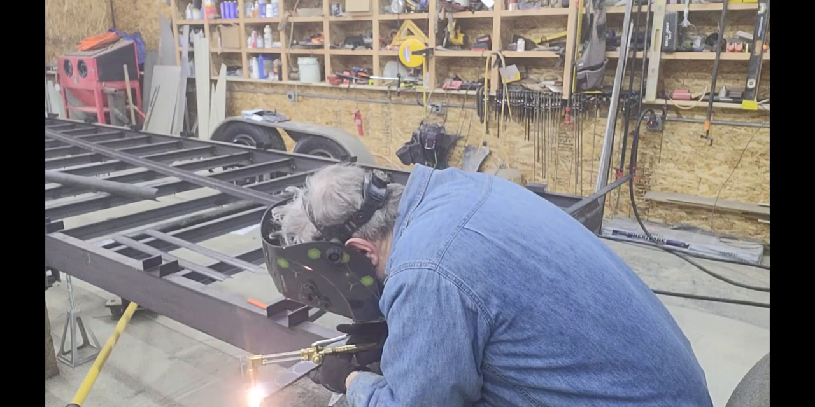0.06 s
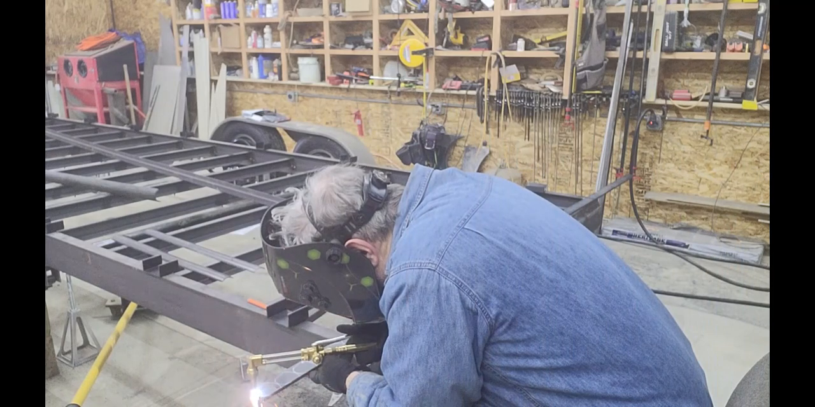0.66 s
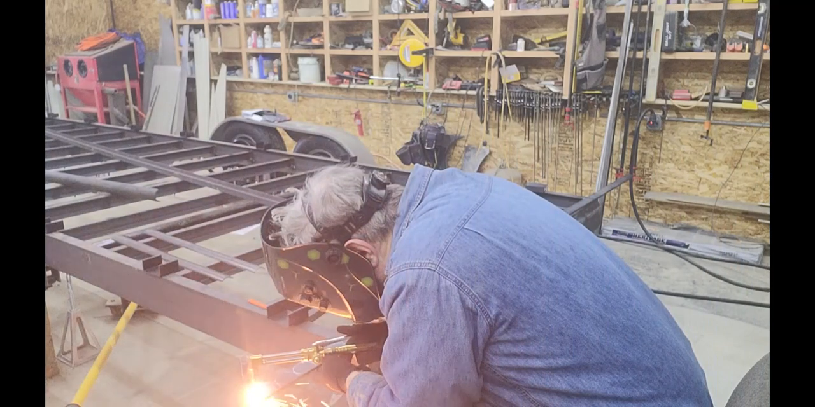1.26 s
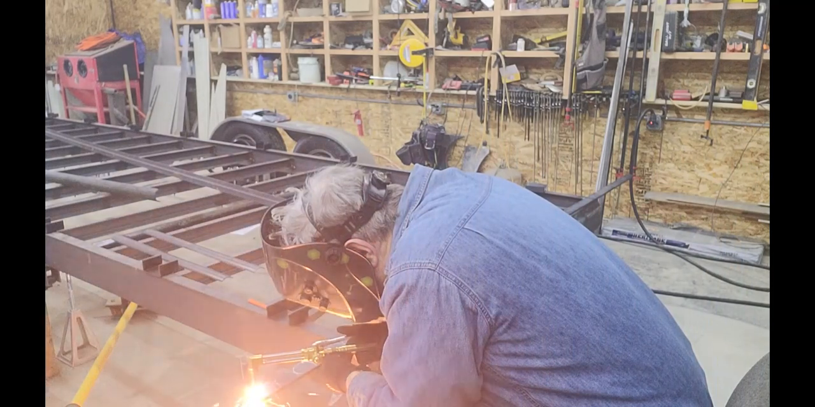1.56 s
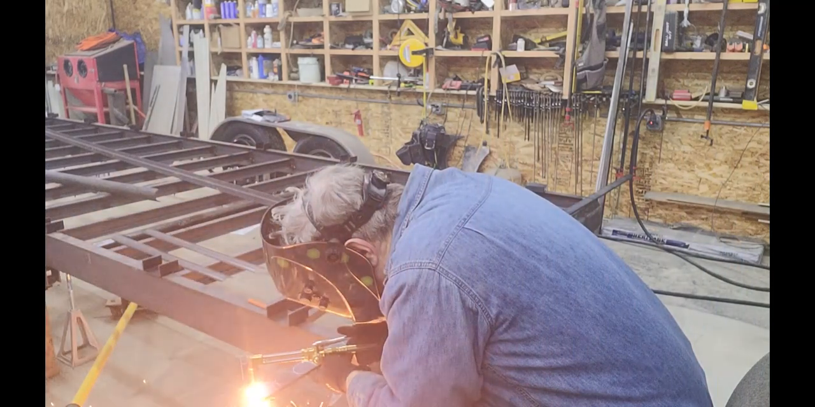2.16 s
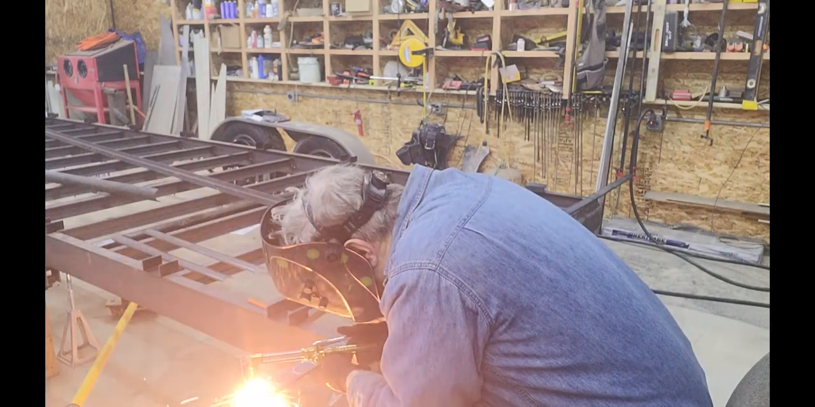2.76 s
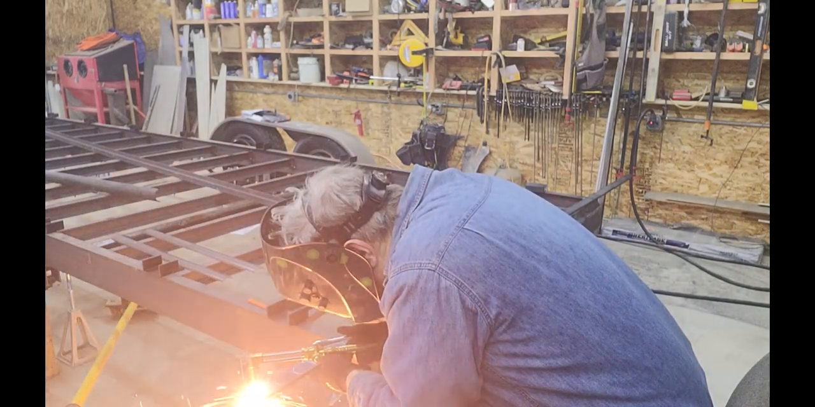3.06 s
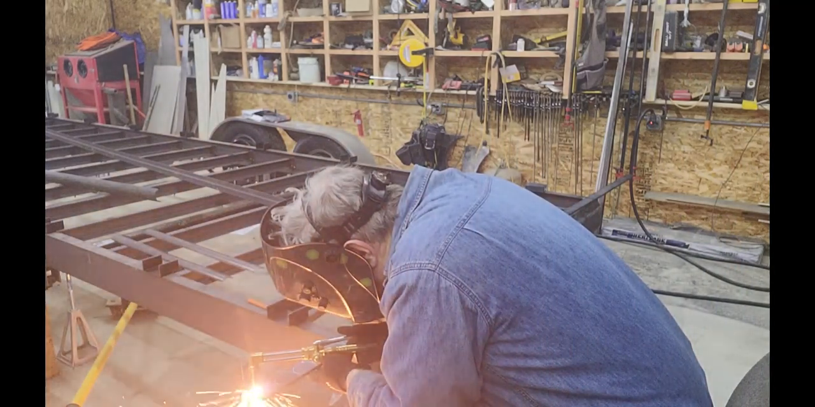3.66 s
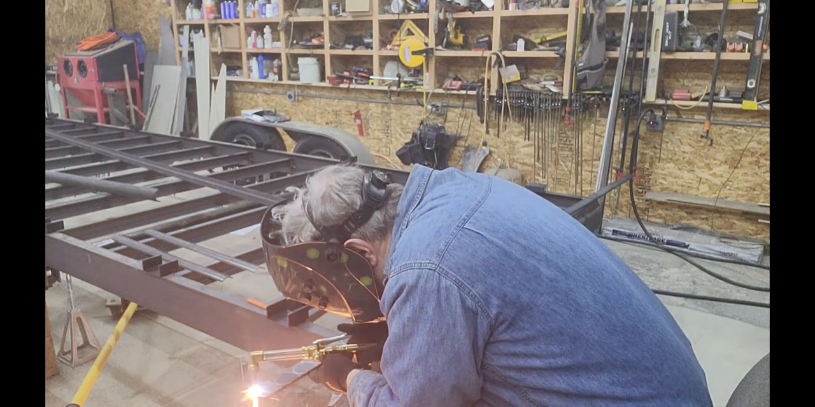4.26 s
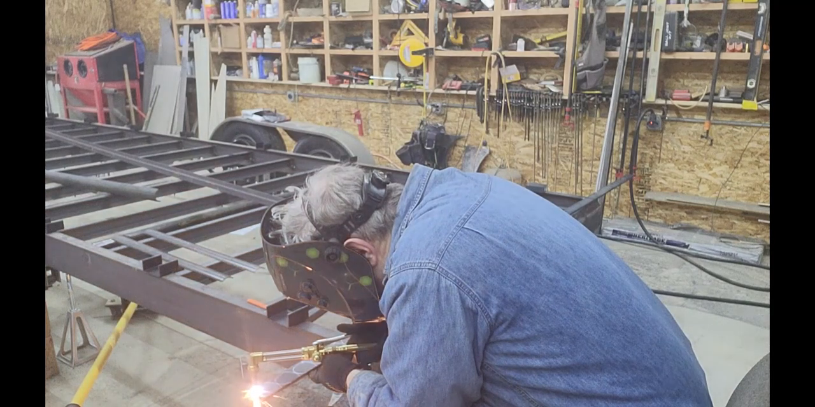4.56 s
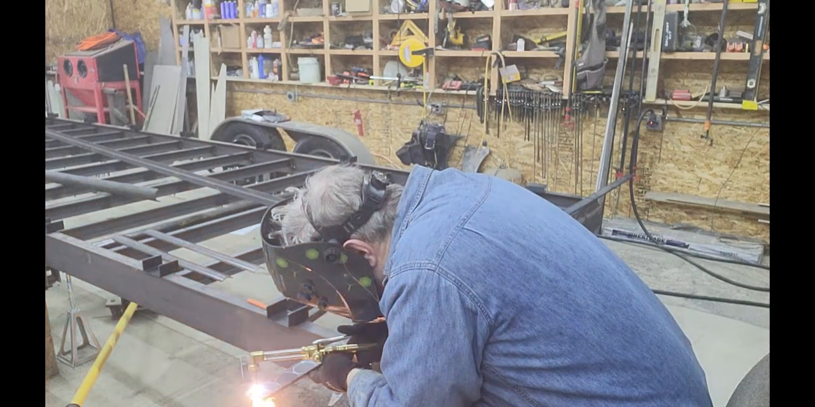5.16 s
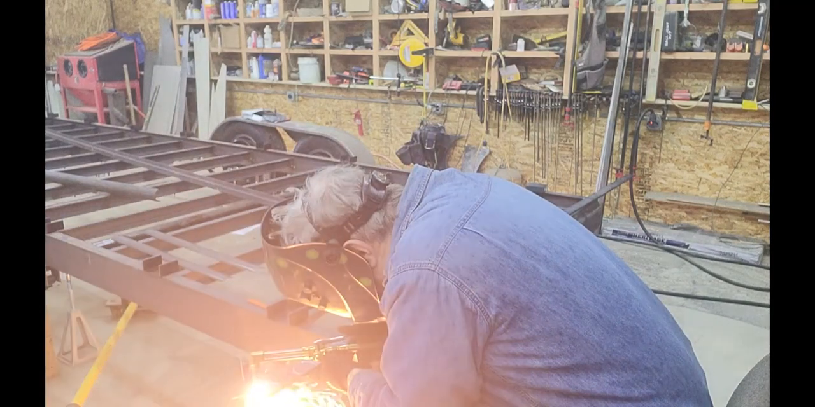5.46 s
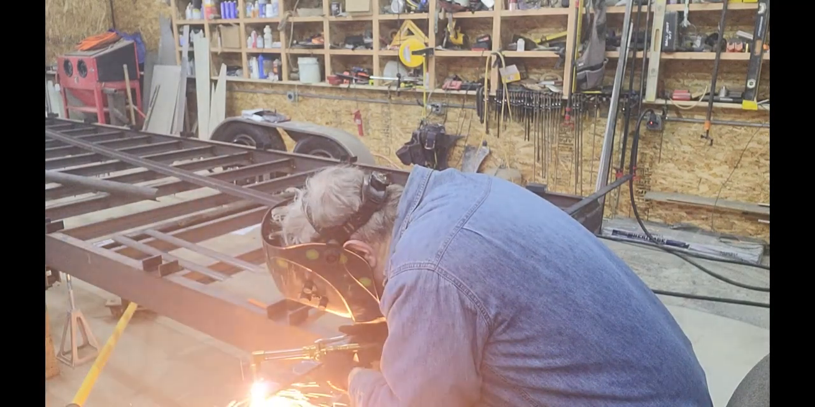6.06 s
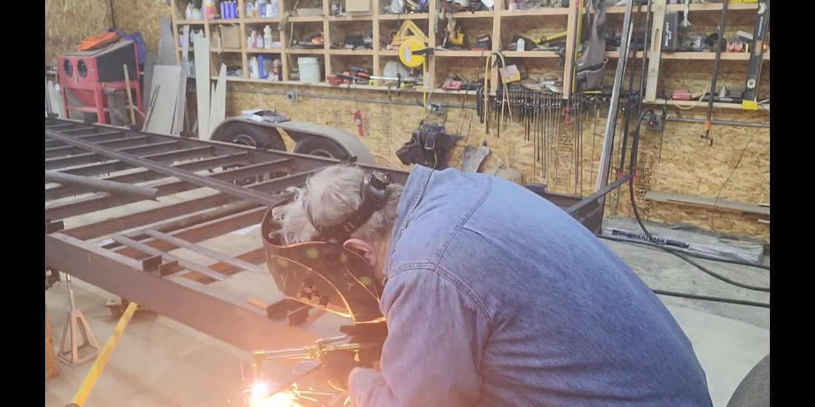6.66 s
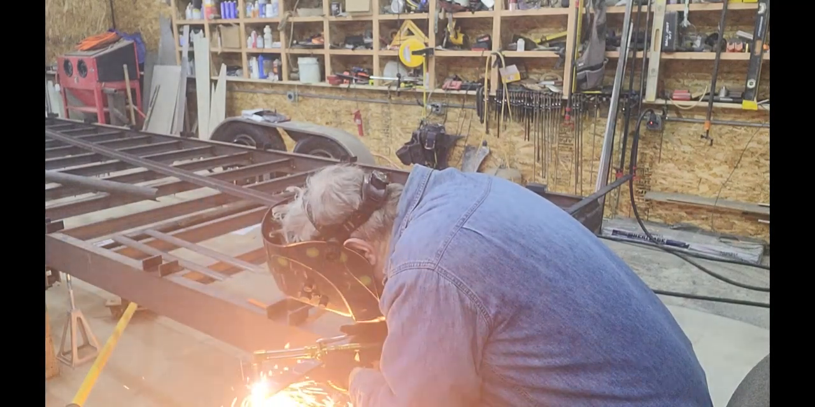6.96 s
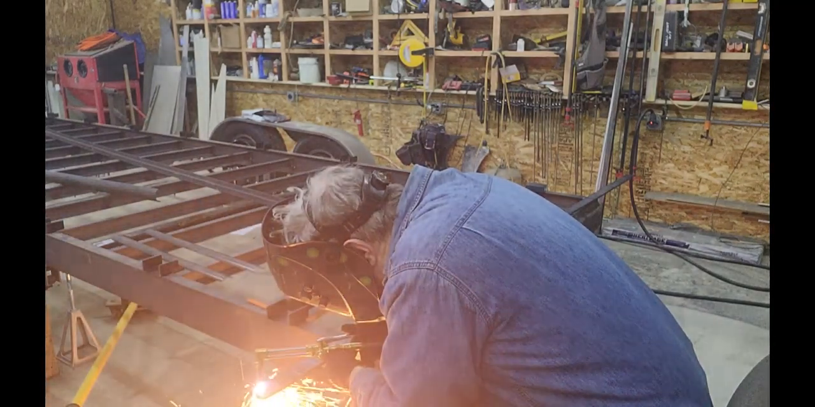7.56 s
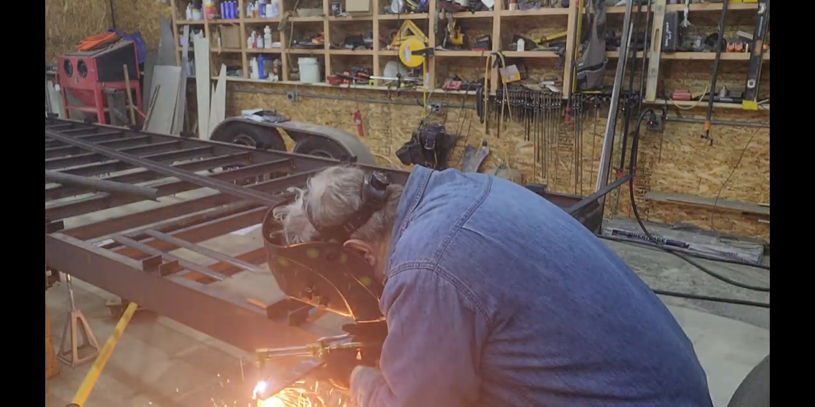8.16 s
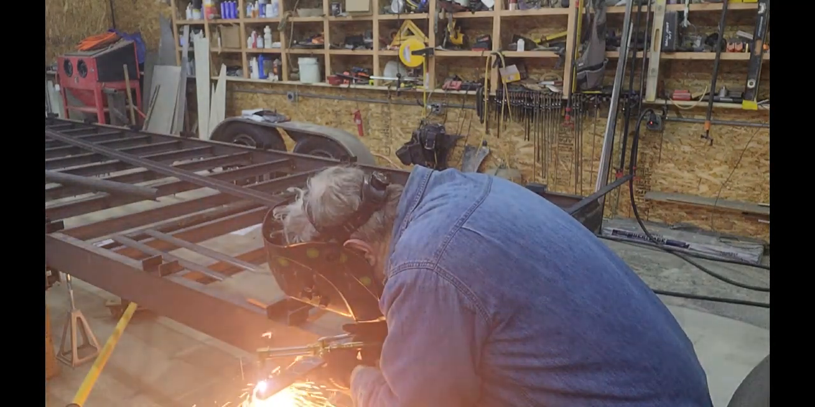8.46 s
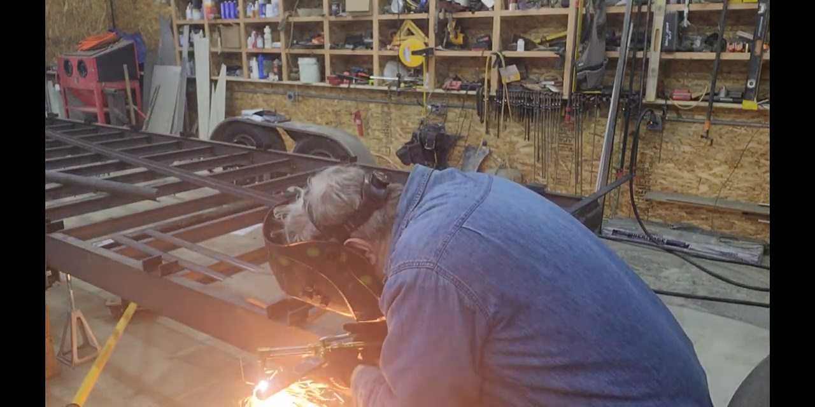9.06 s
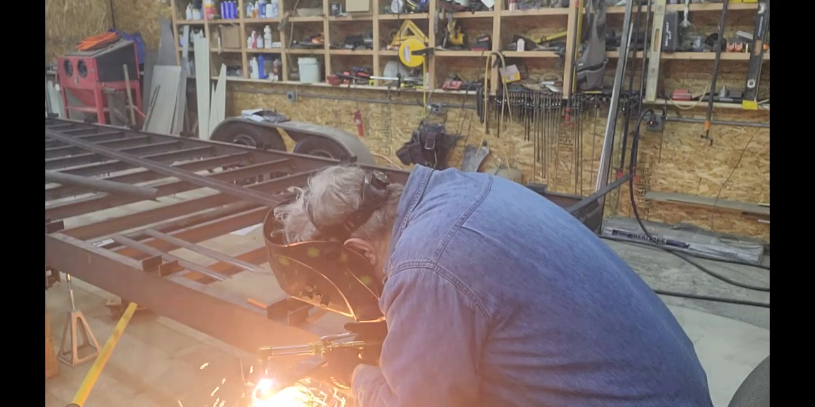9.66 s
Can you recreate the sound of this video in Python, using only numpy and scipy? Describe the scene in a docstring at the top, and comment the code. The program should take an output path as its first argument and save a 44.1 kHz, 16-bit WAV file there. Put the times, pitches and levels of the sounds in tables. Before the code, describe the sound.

A cutting torch hisses through steel plate in a workshop, dipping briefly twice, with small pops and sizzling molten metal.

```python
"""An oxy-acetylene torch cuts steel plate in a workshop, a couple of metres from a stereo camera.
The turbulent oxygen jet hisses over a soft preheat flame and whistles on the plate's edge. Almost at once
the lever is eased: the hiss sinks and the flames sound hollow on the plate. The jet returns; slag flutters
and spits. Near 4 s the steelwork starts to ring, then the lever is eased again. By 5 s the whistle has
faded, and the melt sizzles in surges to the end. Throughout, the room returns most of the sound."""
import sys
import numpy as np
from scipy import signal
from scipy.fft import rfft, irfft, next_fast_len
from scipy.io import wavfile

SR = 44100
rng = np.random.default_rng(int(sys.argv[2]) if len(sys.argv) > 2 else 0)


def file_out(sig):
    """Save sig as 16-bit WAV at sys.argv[1]."""
    # one column per channel
    cols = np.atleast_2d(sig).T
    # limit, then scale
    lim = np.clip(cols, -1, 1)
    pcm = np.round(lim * 32767).astype(np.int16)
    wavfile.write(sys.argv[1], SR, pcm)


N = 433062
SIZE = 2 * next_fast_len(N // 2 + SR // 20)
TIME, HZ = np.arange(N) / SR, np.fft.rfftfreq(SIZE, 1 / SR)


def gain_of(db):
    """Amplitude ratio of a level in decibels."""
    return 10 ** (np.asarray(db) / 20)


def unit_rms(x):
    """Normalisation to rms 1."""
    return x / np.sqrt(np.mean(x ** 2) + 1e-20)


def curves(table):
    """Linear interpolation of each column of a time table, at every sample."""
    times, *columns = np.transpose(table)
    return [np.interp(TIME, times, column) for column in columns]


def shape(spectrum):
    """Spectral envelope: a table's gain, interpolated over log frequency."""
    hz, db = np.transpose(spectrum)
    return gain_of(np.interp(np.log(HZ + 1), np.log(hz + 1), db))


def bell(hz, width):
    """Gaussian band, half as high at the given full width."""
    return 2 ** -(2 * (HZ - hz) / width) ** 2


def response(resonances):
    """Frequency response of peaks and notches in cascade: their decibels add."""
    return gain_of(sum(db * bell(hz, width) for hz, width, db in resonances))


def white():
    """Complex Gaussian spectrum of fresh white noise."""
    return rng.standard_normal(len(HZ)) + 1j * rng.standard_normal(len(HZ))


def wave(spectrum):
    """Inverse Fourier transform to N samples."""
    return irfft(spectrum, SIZE)[..., :N]


def waver(rate_hz):
    """Random modulation: noise of rms 1, low-passed at the given rate."""
    return unit_rms(wave(white() / (1 + (HZ / rate_hz) ** 2)))


def direct_sound(spectrum, lag_s=0.00012):
    """Path difference: sound from the cut reaches the right microphone port before the left."""
    delays = np.array([np.exp(-2j * np.pi * HZ * lag_s), np.ones(len(HZ))])
    return unit_rms(wave(spectrum * delays))


def turbulence(amplitude, colour, direct, t60, coherent_hz=1500):
    """Flow noise in a room: a direct share of the power, and a diffuse field that decays over t60."""
    decay = 1000 ** (-2 / (t60 * SR))
    room_power = signal.lfilter([1 - decay], [1, -decay], amplitude ** 2,
                                zi=[decay * amplitude[0] ** 2])[0]
    coherence = np.sinc(HZ / coherent_hz)  # a diffuse field is alike at both ports only in the bass
    shared, opposed = np.sqrt(1 + coherence) * white(), np.sqrt(1 - coherence) * white()
    diffuse = unit_rms(wave(colour * np.array([shared + opposed, shared - opposed])))
    straight = np.sqrt(direct) * amplitude * direct_sound(colour * white())
    return straight + np.sqrt((1 - direct) * room_power) * diffuse


# resonances of the work and the corner it stands in: (frequency [Hz], width [Hz], gain [dB])
CORNER_MODES = [(76.5, 13, -1.5), (87, 9.1, -5), (136.5, 20, 4.5), (159, 16, -4), (256, 25, 3),
                (388, 120, 2), (461, 25, 3), (778, 20, 1.5), (910, 56, 2), (1170, 56, -1), (1349, 58, 3.5),
                (1443, 22, 3.5), (1610, 630, -1), (1677, 27, 2.5), (1806, 32, 3.5), (2203, 41, 2.5)]

def workshop(x, echo_db=-7.5, reach_s=.05, scatter_hz=900, dull_hz=8000, count=60):
    """Scattering: steel beams return early echoes of the shorter waves; the corner adds resonances."""
    taps = np.zeros((2, SIZE))
    delays = ((.001 + reach_s * rng.random((2, count))) * SR).astype(int)
    np.put_along_axis(taps, delays, rng.choice([-1, 1], delays.shape) / np.sqrt(count), 1)
    scattering = HZ / np.hypot(HZ, scatter_hz) / np.hypot(1, HZ / dull_hz)
    echoes = gain_of(echo_db) * rfft(taps) * scattering
    return wave(rfft(x, SIZE) * (1 + echoes) * response(CORNER_MODES))


# hollows of the steelwork: (frequency [Hz], width [Hz], level [dB])
CAVITY_MODES = [(263.5, 16, -74), (408, 45, -73), (900, 60, -67.5), (1415, 130, -67)]

def cavities(pierced_s=3.8, deepen_s=0.65, unrest_db=5.0, pitch_drift=.018):
    """Cavity resonance: once the cut is deep, the jet excites hollows that waver in level and pitch."""
    depth = np.clip((TIME - pierced_s) / deepen_s, 1e-3, 1)
    out = np.zeros((2, N))
    for hz, width, db in CAVITY_MODES:
        amplitude = depth * gain_of(db) * unit_rms(gain_of(unrest_db * waver(4.3)))
        ring = turbulence(amplitude, bell(hz, width), direct=0.33, t60=0.14)
        warped_time = TIME + pitch_drift * np.cumsum(waver(4)) / SR
        out += np.array([np.interp(warped_time, TIME, port) for port in ring])
    return out


# gushes of slag blown out of the cut: (start [s], duration [s], level [dB])
GUSHES = [(.22, 0.13, -68), (0.416, 0.11, -65), (1.11, 0.32, -80), (1.486, 0.16, -67.5), (1.795, 0.06, -64),
          (1.998, 0.087, -62.5), (2.15, 0.25, -73), (2.45, .055, -63), (2.854, 0.14, -66),
          (3.04, 0.16, -72), (3.25, .14, -64), (3.46, .08, -68), (3.57, .05, -64), (3.714, .12, -70.5),
          (4.41, .15, -71), (4.8, .1, -80), (5.27, 0.16, -67.5), (5.44, 0.076, -61), (5.577, .11, -63.5),
          (5.7, 0.75, -70.5), (5.81, 0.09, -68), (6.173, 0.077, -69), (6.34, 0.15, -70), (6.554, 0.11, -67),
          (6.76, 0.08, -64), (6.92, 0.096, -68.5), (7.106, 0.15, -63.5), (7.28, 0.14, -66), (7.5, .12, -74),
          (7.81, 0.062, -70), (7.98, 0.09, -74), (8.335, 0.2, -67.5), (8.745, 0.05, -67),
          (8.988, 0.13, -64), (9.14, .07, -72), (9.427, 0.11, -69), (9.57, 0.1, -63), (9.773, .06, -67)]

def melt_flow(trickle_db=-91, uneven_db=4, rise_s=0.0073, fall_db_per_s=235, kick_db=2, kick_s=0.027):
    """Envelope of the slag flow: a trickle and gushes, incoherent sources whose powers add."""
    flow = gain_of(trickle_db + uneven_db * waver(3.4))
    for start, length, db in GUSHES:
        t = np.arange(0, length + 1, 1 / SR)
        puff_db = kick_db * np.exp(-t / kick_s)  # each gush breaks loose with a puff
        drain_db = fall_db_per_s * np.maximum(t - length, 0)
        gush = np.minimum(t / rise_s, 1) * gain_of(db + puff_db - drain_db)
        part = flow[round(start * SR):][:len(t)]
        part[:] = np.hypot(part, gush[:len(part)])
    return flow


# spectrum of the slag's flutter: (frequency [Hz], relative level [dB])
SLAG_SPECTRUM = [(15, -20), (30, -16), (48, -3), (80, 4.5), (115, -1), (180, 0), (350, -4.5), (800, -15.5),
                 (2500, -21), (9000, -48)]

def slag(flow, trim_db=3.0, gulp_db=0.5):
    """Unsteady flow: the jet expels melt in gulps, which modulate a low noise into a flutter."""
    amplitude = flow * gain_of(trim_db + gulp_db * waver(16))
    return turbulence(amplitude, shape(SLAG_SPECTRUM), direct=0.73, t60=0.19, coherent_hz=90)


def sparks(hiss_db, flow, colour, per_s=220, spread_db=3, trim_db=-17.0):
    """Shot noise: burning droplets burst in tiny ticks, more often when much slag is flying."""
    strength = gain_of(spread_db * np.minimum(rng.exponential(1, N), 2))
    chance = unit_rms(np.sqrt(flow)) * per_s / SR
    ticks = strength * (rng.random(N) < chance) * rng.choice([-1, 1], N)
    return gain_of(hiss_db + trim_db) * direct_sound(rfft(ticks, SIZE) * colour)


# blobs of melt blown clear: (start [s], level [dB], duration [s], pitch [Hz], width [Hz])
BLOBS = [(0.592, -53, .02, 760, 700), (1.602, -57, 0.013, 700, 900), (1.796, -47.5, 0.009, 750, 1200),
         (2.003, -51, 0.009, 1150, 1100), (2.032, -63, 0.035, 280, 260), (2.921, -49.5, 0.016, 1300, 550),
         (4.324, -52, 0.024, 660, 800), (4.358, -59.5, 0.046, 434, 400), (4.716, -49.5, 0.0081, 810, 800),
         (4.847, -54, 0.015, 1350, 700), (5.286, -51.5, 0.0087, 700, 1000),
         (5.406, -47.5, 0.01, 2350, 1200), (5.474, -55, 0.02, 1000, 700), (5.568, -49, 0.017, 1280, 600),
         (5.615, -51, .008, 1300, 1700), (7.861, -55, 0.076, 850, 700), (8.861, -50.5, 0.019, 910, 200)]

def splutters(rise_s=0.0015, fall_db_per_s=750, bass_hz=170, room_db=-9, t60=0.25):
    """Pressure release: a blob chokes the cut and bursts out with a pop, pitched by the gap it leaves."""
    out, t = np.zeros((2, N)), TIME[:SR // 3]
    hz = np.fft.rfftfreq(len(t), 1 / SR)
    for start, db, length, pitch_hz, width in BLOBS:
        colour = 2 ** -(2 * (hz - pitch_hz) / width) ** 2 * hz ** 2 / (hz ** 2 + bass_hz ** 2)
        noises = rng.standard_normal((3, len(t)))
        puff, *echoes = [unit_rms(irfft(rfft(noise) * colour, len(t))) for noise in noises]
        after = np.maximum(t - length, 0)
        burst = np.minimum(t / rise_s, 1) * gain_of(-fall_db_per_s * after)
        tail = np.minimum(t / length, 1) * gain_of(room_db - 60 * after / t60)
        pop = unit_rms(puff * burst) * np.sqrt(np.mean(burst ** 2)) + tail * np.array(echoes)
        part = out[:, round(start * SR):][:, :len(t)]
        part += gain_of(db) * pop[:, :part.shape[1]]
    return out


# surges of sizzling metal: (centre time [s], duration [s], level [dB])
SURGES = [(2.25, .12, -54), (5.637, .06, -47), (6.18, .1, -56), (6.44, .1, -56), (7.15, .13, -54),
          (7.4, .06, -53), (7.58, 0.15, -48), (7.86, .05, -52), (8.04, .11, -50), (8.3, .13, -54),
          (8.6, 0.11, -50), (8.79, .15, -47), (9.04, .05, -53), (9.2, .06, -49.5), (9.34, .08, -54),
          (9.62, .08, -62)]

def sizzle(drop_db, hz=11650, width_hz=1500, unrest_db=2):
    """Amplitude-modulated band noise: melt deep in the cut sizzles in restless surges."""
    surges = sum(gain_of(db) * 2 ** -(2 * (TIME - centre) / length) ** 2 for centre, length, db in SURGES)
    amplitude = surges * gain_of(drop_db + unrest_db * waver(22)) + 1e-9
    return turbulence(amplitude, bell(hz, width_hz), direct=0.38, t60=.15)


# roar of the preheat flame: (time [s], level [dB])
FLAME_LEVEL = [(0, -46), (.28, -49.5), (.5, -49), (.6, -49.5), (1.0, -53), (1.4, -49.5), (2.25, -53.5),
               (2.5, -50), (2.7, -53.3), (2.84, -52), (2.88, -50), (3.35, -53), (4.05, -53.5), (4.35, -53),
               (4.58, -51.5), (4.72, -50), (5.2, -50.5), (5.55, -51), (7.6, -50.5), (8.28, -52.5),
               (8.36, -52), (8.7, -53), (9.05, -52.5), (9.35, -53), (9.5, -51), (9.82, -51)]
# the flame spreading on the plate: (time [s], level [dB])
BOOM_LEVEL = [(.15, -84), (.25, -61), (.35, -54), (.42, -61), (.52, -59), (.62, -80)]
# spectrum of the roar: (frequency [Hz], relative level [dB])
FLAME_SPECTRUM = [(25, -62), (60, -46), (100, -19), (140, -9), (250, -2.5), (420, -1), (650, 3.5),
                  (900, 4.5), (1500, -1), (2500, -3), (5000, -12), (9000, -23), (15500, -7.5)]

def flame(trim_db=0.46, flicker_db=1.07, boom_hz=395, boom_width_hz=200):
    """Combustion noise: the flames roar softly, and sound hollow as they spread on unpierced plate."""
    flicker = gain_of(flicker_db * waver(43))
    spreading = flicker * gain_of(curves(BOOM_LEVEL)[0])
    burning = flicker * gain_of(curves(FLAME_LEVEL)[0] + trim_db)
    boom = turbulence(spreading, bell(boom_hz, boom_width_hz), direct=0.28, t60=0.16)
    roar = turbulence(burning, shape(FLAME_SPECTRUM), direct=0.21, t60=0.26, coherent_hz=1180)
    return boom + roar


# the jet on the plate's edge, fading as the cut deepens: (time [s], hiss [dB], whistle [dB])
EDGE_LEVELS = [(0, -48, -58), (.12, -55, -48), (.75, -47.5, -53.5), (1.3, -50, -56), (1.9, -53, -68),
               (2.6, -54, -73), (3.05, -53.5, -52), (4.3, -56, -76), (4.8, -60, -58), (5.2, -70, -76)]

def edge_tone(drop_db, whistle_hz=6622, whistle_width_hz=55, hiss_hz=7000, hiss_width_hz=1700):
    """Edge tone: split by the plate's edge, the jet sings a breathy whistle over a sharp hiss."""
    hiss_db, whistle_db = curves(EDGE_LEVELS) + drop_db
    hiss = turbulence(gain_of(hiss_db), bell(hiss_hz, hiss_width_hz), direct=.35, t60=0.22)
    whistle = turbulence(gain_of(whistle_db), bell(whistle_hz, whistle_width_hz), direct=0.89, t60=.2)
    return hiss + whistle


# easings of the oxygen lever: (eased [s], pressed again [s], hiss depth [dB], fizz depth [dB])
DROPOUTS = [(0.142, 0.524, -23.5, -14.5), (4.377, 4.626, -24, -17.5)]

def lever(hiss_bleed_s=0.14, fizz_bleed_s=0.042, hiss_open_s=0.043, fizz_open_s=0.078):
    """Exponential relaxation: the drop of hiss and fizz, in dB, as the eased lever lets oxygen bleed off."""
    drop_db = np.zeros((2, N))
    for eased, pressed, hiss_db, fizz_db in DROPOUTS:
        since = np.maximum(TIME - eased, 0)
        hiss_shut = np.clip(1 - (TIME - pressed) / hiss_open_s, 0, 1) ** 2
        fizz_shut = np.clip(1 - (TIME - pressed) / fizz_open_s, 0, 1) ** 2
        drop_db[0] += hiss_db * hiss_shut * (1 - np.exp(-since / hiss_bleed_s))
        drop_db[1] += fizz_db * fizz_shut * (1 - np.exp(-since / fizz_bleed_s))
    return drop_db


def shimmer(x, depth_db, patch_hz, patch_s, frame=1024, hop=256):
    """Spectral modulation: random bands swell and fade, each in its own time."""
    bands = signal.stft(x, nperseg=frame, noverlap=frame - hop)[2]
    patches = rng.standard_normal(bands.shape[1:])
    for axis, span in enumerate([patch_hz * frame / SR, patch_s * SR / hop]):
        kernel = np.exp(-(2 * np.arange(-60, 61) / span) ** 2)
        patches = signal.fftconvolve(patches, np.expand_dims(kernel, 1 - axis), "same")
    bands *= gain_of(depth_db * unit_rms(patches))
    return signal.istft(bands, nperseg=frame, noverlap=frame - hop)[1][:, :N]


# the cutting oxygen with the lever held down: (time [s], level [dB])
JET_LEVEL = [(0, -37.5), (.1, -36.5), (.17, -37.3), (.56, -38.5), (.65, -39.5), (.71, -37.5), (.87, -40.5),
             (1.3, -39.5), (1.85, -42), (2.35, -41.8), (2.58, -41), (2.83, -42.5), (2.88, -40.6),
             (3.08, -41), (3.97, -43.5), (4.35, -42), (4.67, -40.5), (4.86, -39.5), (4.92, -41.5),
             (5.2, -44.5), (5.3, -41.5), (5.4, -43), (5.47, -41), (5.8, -42), (6.5, -41.5), (6.8, -43),
             (7.28, -42.6), (7.55, -41), (8.14, -42.5), (8.21, -41), (8.28, -42), (8.8, -41), (9.2, -41.5),
             (9.45, -41.5), (9.82, -40)]
# the treble relative to that level: (time [s], level [dB])
FIZZ_LEVEL = [(0, -4), (.1, -2), (.17, 1), (.58, -0.5), (.8, 0.5), (1.3, -1.5), (2.05, 2.5), (2.3, 0.7),
              (2.6, -0.5), (3.6, 1.5), (4.85, 0), (5.0, -3), (5.17, -0.7), (5.62, 0.5), (5.85, -1),
              (6.4, -1), (6.8, -.7), (7.2, 1.5), (7.6, 0), (8.05, 0.5), (8.5, 0), (9.22, 1.5), (9.6, -1.5)]
# spectrum of the jet: (frequency [Hz], relative level [dB])
JET_SPECTRUM = [(40, -70), (150, -49), (600, -19.5), (1200, -2.5), (2000, -1.05), (3100, 2), (4000, -0.05),
                (6000, -0.5), (8000, -2), (10500, -2.5), (13000, -2.5), (15500, -4.5)]

def jet(drop_db, hiss_trim_db=-0.88, flutter_db=0.75, fizz_flutter_db=0.45, split_hz=8300):
    """Turbulent jet noise: the oxygen hisses and its finest eddies fizz; the colour shimmers slightly."""
    coarse, fine = gain_of(curves(JET_LEVEL)[0] + drop_db + flutter_db * waver(33))
    colour = shape(JET_SPECTRUM)
    low_share = 1 / (1 + (HZ / split_hz) ** 12)
    hiss = turbulence(coarse * gain_of(hiss_trim_db), colour * np.sqrt(low_share), direct=0.3, t60=0.22)
    brightness = gain_of(curves(FIZZ_LEVEL)[0] + fizz_flutter_db * waver(16))
    fizz = turbulence(fine * brightness, colour * np.sqrt(1 - low_share), direct=0.38, t60=0.19)
    return shimmer(hiss + fizz, depth_db=1.0, patch_hz=300, patch_s=.08)


def scene():
    """Superposition: the sounds of gas and molten metal add in the workshop."""
    drop_db, flow = lever(), melt_flow()
    hiss_drop_db = drop_db[0]
    hiss_db = curves(JET_LEVEL)[0] + hiss_drop_db
    gas = jet(drop_db) + edge_tone(hiss_drop_db) + flame() + cavities()
    metal = sizzle(hiss_drop_db) + slag(flow) + splutters() + sparks(hiss_db, flow, shape(JET_SPECTRUM))
    return workshop(gas + metal)


# peaks and notches of each microphone port: (frequency [Hz], width [Hz], gain [dB])
LEFT_PORT = [(1240, 2600, 1.35), (5200, 2600, 5), (6490, 430, 4.5), (7820, 890, -4), (12500, 3400, 3)]
RIGHT_PORT = [(1900, 3500, -0.5), (4970, 3400, 1), (9200, 1100, -2.5), (12040, 2300, 7.5)]

def record(dry, cutoff_hz=15850):
    """Linear filtering: each port colours the sound in its own way, then a low-pass limits the band."""
    heard = wave(rfft(dry, SIZE) * np.array([response(LEFT_PORT), response(RIGHT_PORT)]))
    low_pass = signal.firwin(1023, cutoff_hz, window=("kaiser", 9), fs=SR)
    return signal.oaconvolve(heard, low_pass[None], "same")


dry = scene()
out = record(dry)
file_out(out)
```